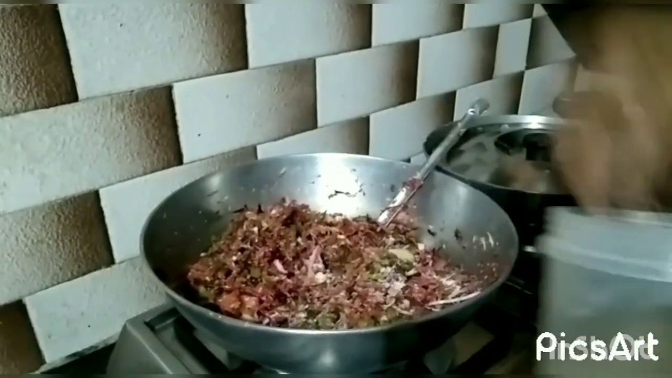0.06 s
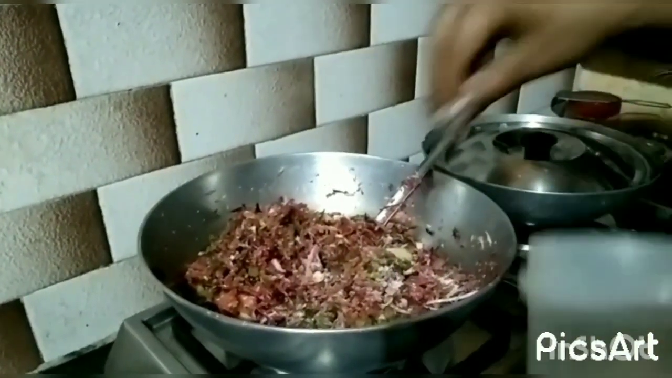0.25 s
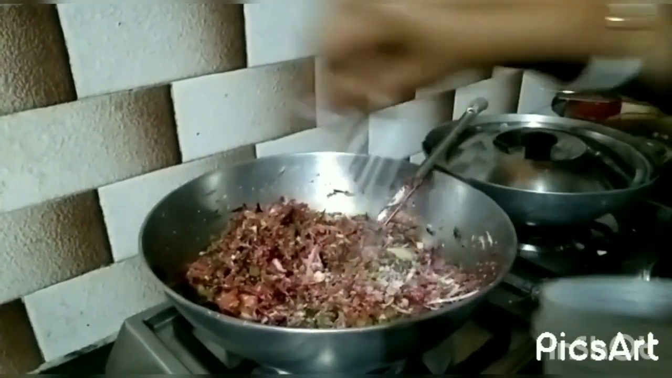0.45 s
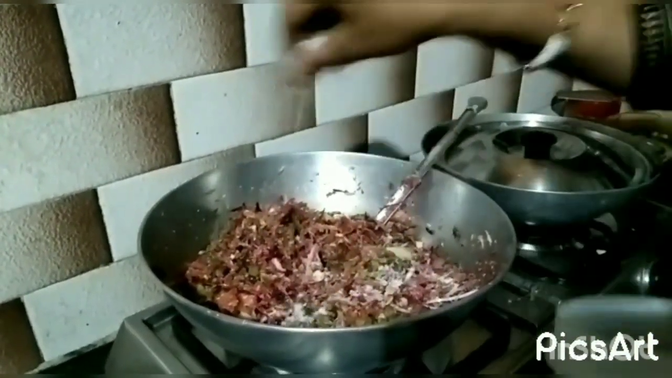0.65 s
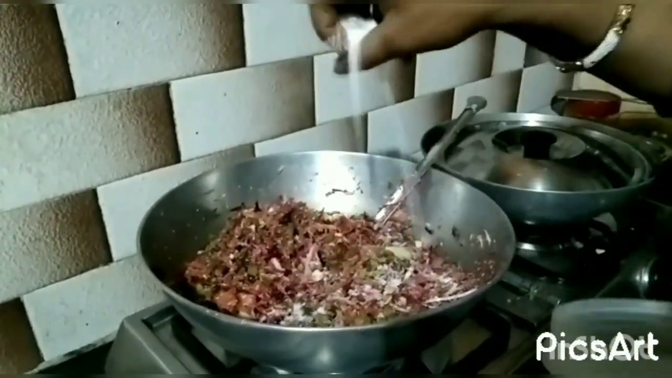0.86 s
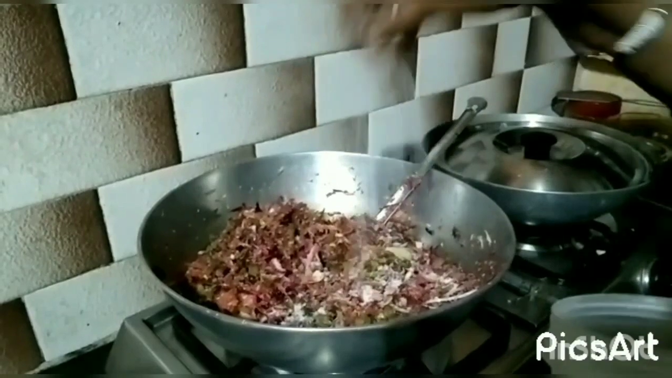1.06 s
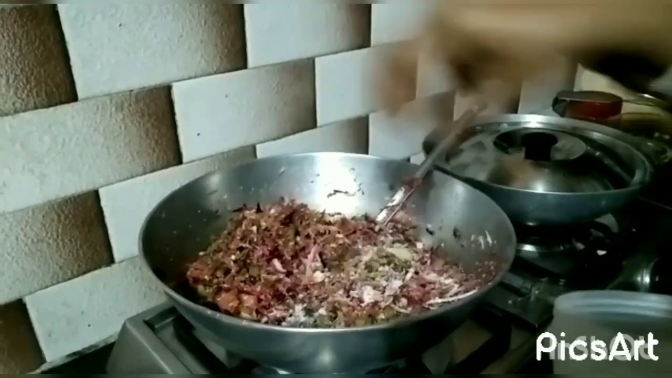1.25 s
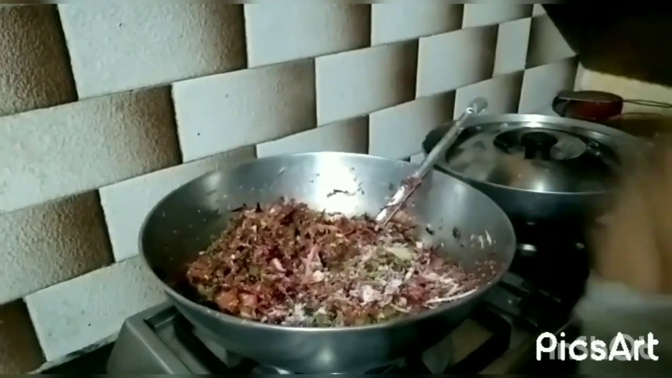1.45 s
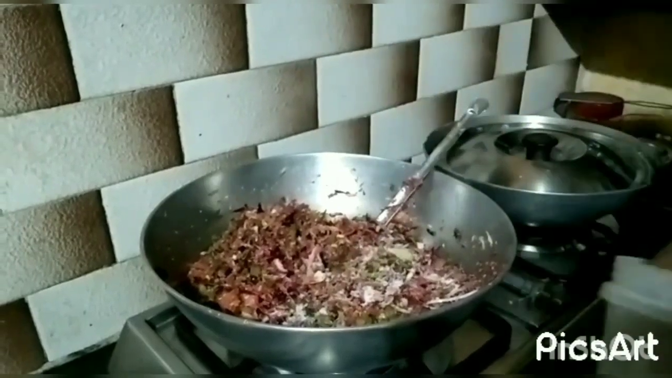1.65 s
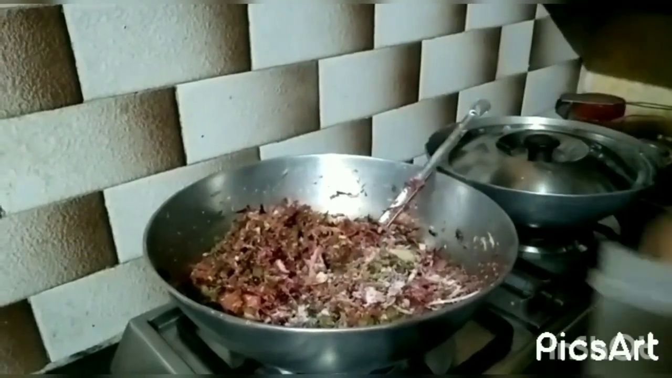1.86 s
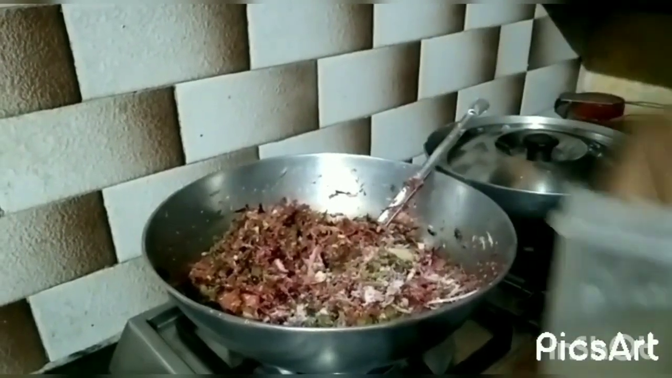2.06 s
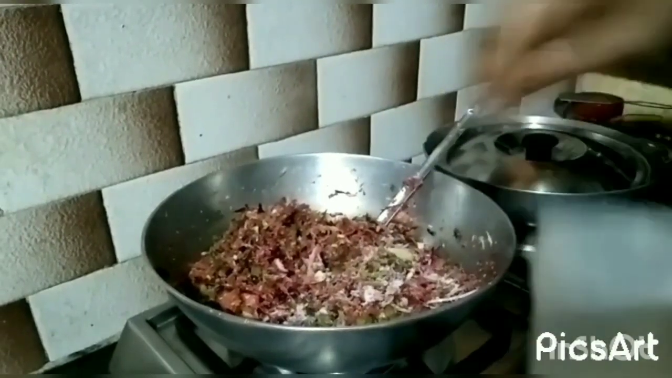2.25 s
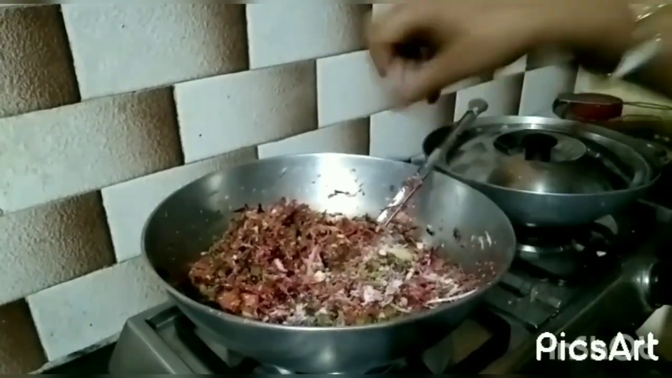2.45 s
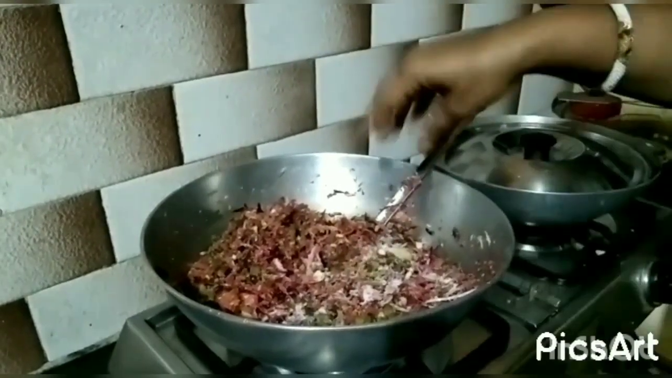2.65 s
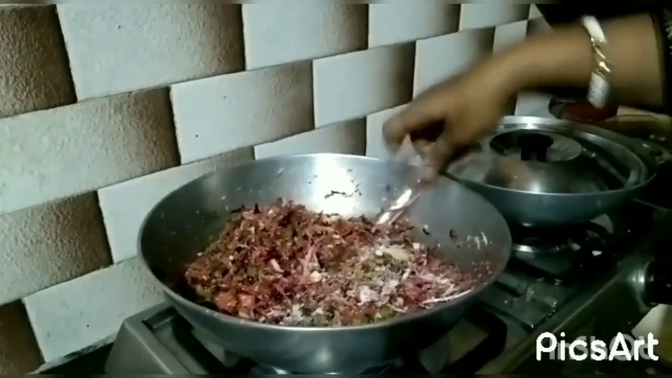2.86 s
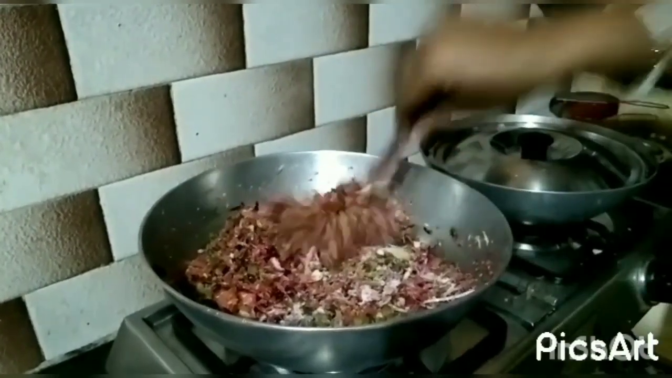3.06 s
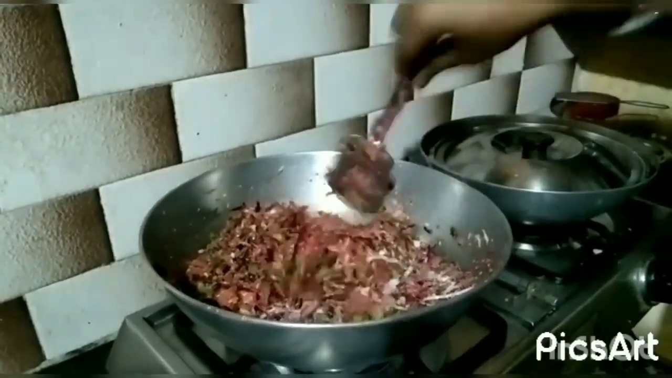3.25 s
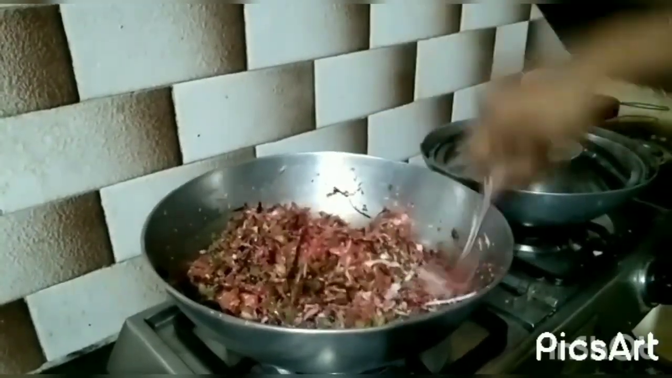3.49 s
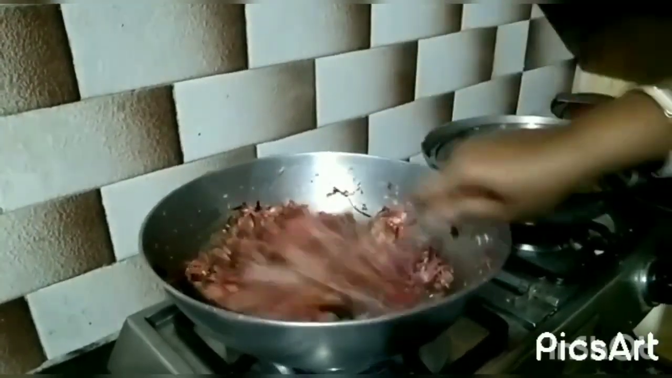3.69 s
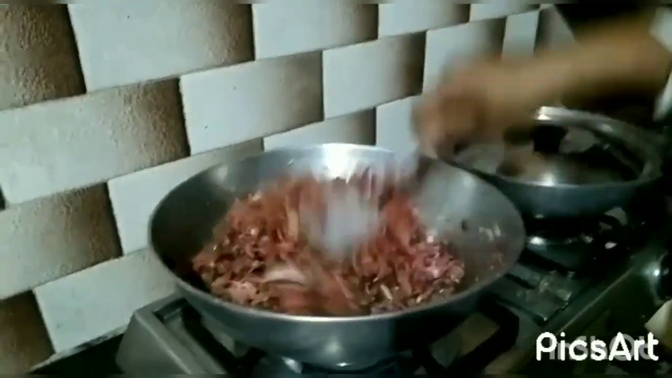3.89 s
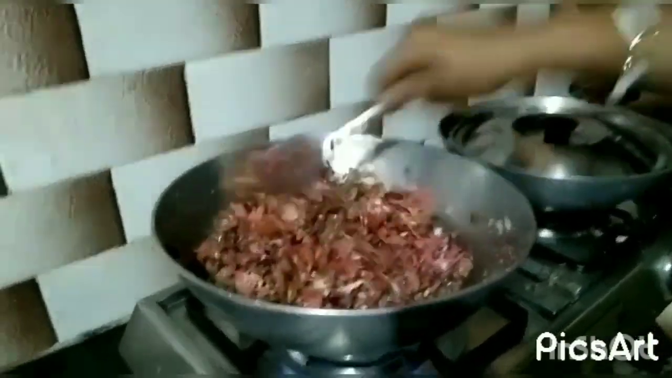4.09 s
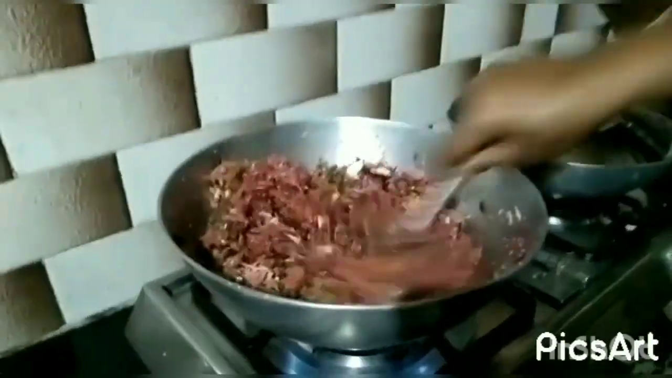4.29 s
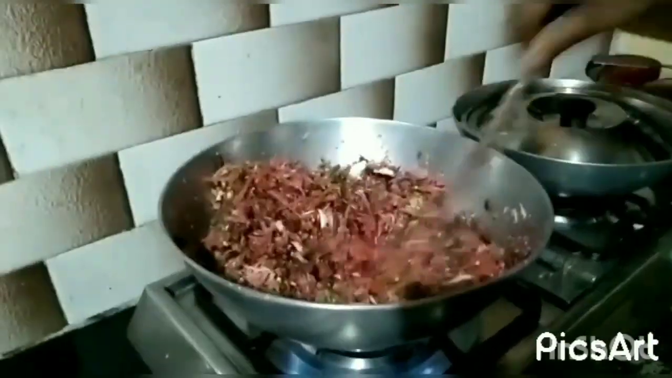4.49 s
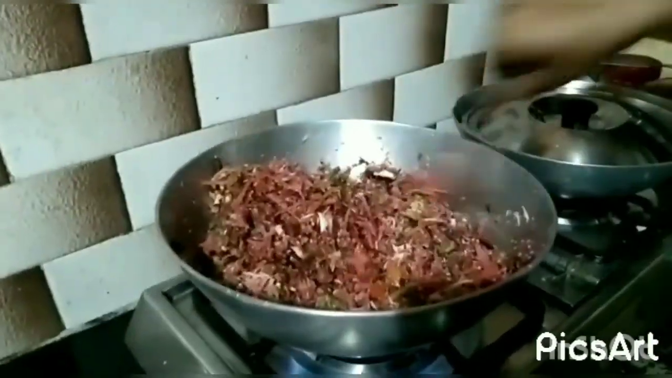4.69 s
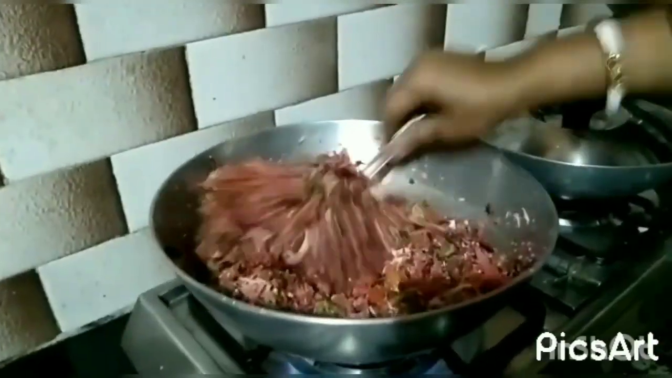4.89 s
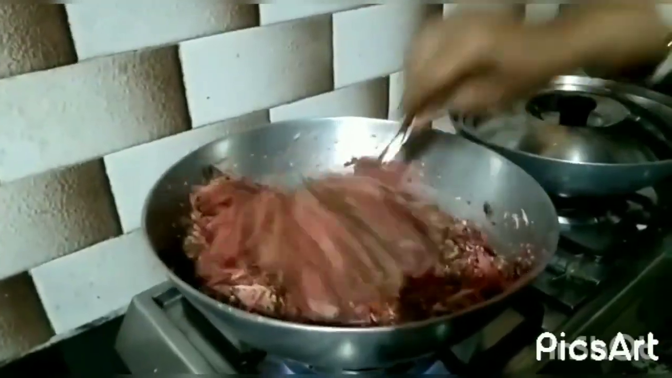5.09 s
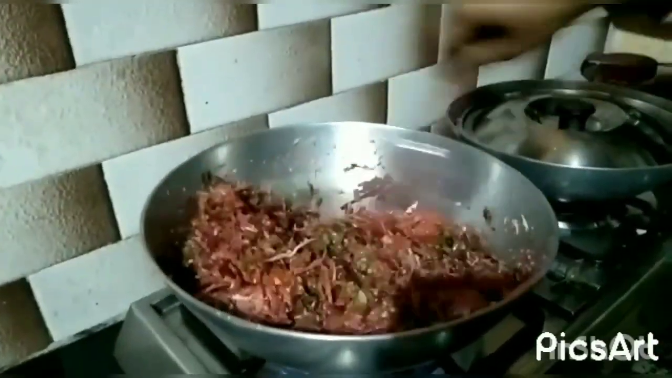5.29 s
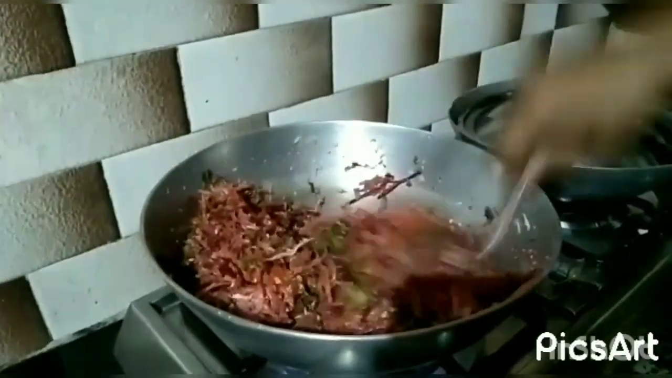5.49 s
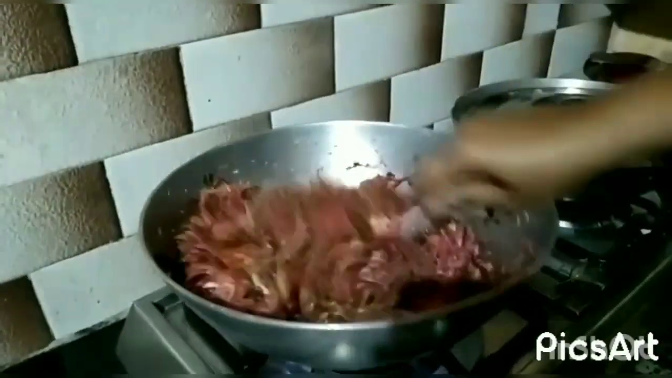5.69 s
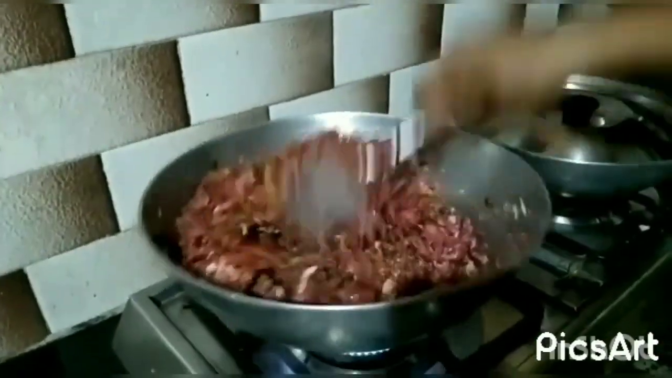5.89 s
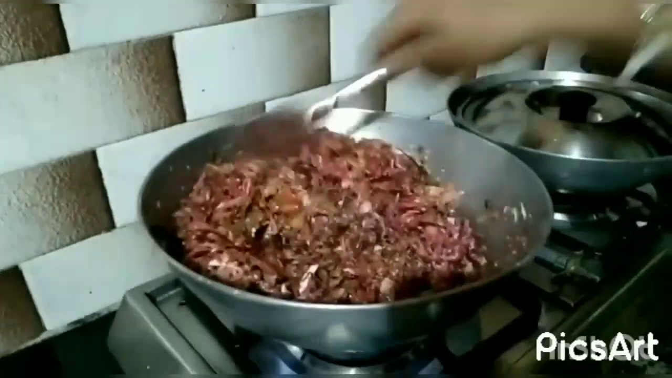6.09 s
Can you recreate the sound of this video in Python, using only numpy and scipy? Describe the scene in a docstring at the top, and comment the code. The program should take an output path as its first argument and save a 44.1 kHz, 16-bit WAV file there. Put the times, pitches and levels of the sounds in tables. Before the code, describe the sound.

Close, mono, in a small tiled kitchen with a short reverberation. From 0 to 3 seconds there is only a steady, bright, finely sputtering frying hiss, over a very faint lumpy gas flame roar and a low wavering mains hum. At 3.0 a jar lands on the counter with a sharp, short thud; at 3.3 a softer, duller nudge follows. From 3.55 to 3.9 a steel spatula scrapes lightly down the pan wall with small high ticks, then brief weaker scrapes come at 4.05 and 4.6, with faint bowl knocks between. The sizzle rises a little around 4.2. At 4.85 to 5.2 a stronger, ringing scrape chatters with several ticks. At 5.53 the loudest scrape bites in with a piercing metallic tick and slides until 5.9. At 6.0 a hard double knock clangs on the steel bowl, the sizzle now louder.

```python
"""Chopped vegetables sizzle in a thin steel pan over a gas flame, with mains hum beneath, heard close in mono.
A jar is set down on the counter; then a steel spatula lands on the pan wall, scrapes down it in strokes,
turns the food onto hot metal so that it sizzles louder, and knocks the bowl of the pan.
Metal and counter are banks of resonances driven by clicks and blows; sizzle and flame are shaped noise,
the hum is a pair of sines, and the kitchen is a tail of random taps."""
import sys
import numpy as np
from scipy import signal
from scipy.io import wavfile
from scipy.ndimage import uniform_filter1d

SR = 44100
rng = np.random.default_rng(int(sys.argv[2]) if len(sys.argv) > 2 else 0)


def ratio(d):
    """dB to gain"""
    e = np.asarray(d, float) / 20
    return 10 ** e


def generate_wav(signal):
    """Clip the signal to [-1, 1] and save it as 16-bit WAV at the path in sys.argv[1]."""
    frames = np.transpose(np.atleast_2d(signal))
    scaled = np.clip(frames, -1, 1) * 32767
    pcm = np.round(scaled).astype(np.int16)
    wavfile.write(sys.argv[1], SR, pcm)


N = 270774

# resonances of the spatula blade under a sliding edge: (frequency [Hz], width [Hz], relative level [dB])
BLADE = [(4300, 100, -4), (4550, 90, -4), (4770, 45, 1), (4950, 90, -5), (5120, 80, -4), (5357, 55, 0),
         (5477, 50, 1), (5700, 90, -4), (5930, 70, -3), (6293, 50, 0), (6600, 90, -2)]
# resonances of the pan wall: (frequency [Hz], width [Hz], relative level [dB])
WALL = [(1536, 40, 0.5), (1688, 40, 2.5), (1836, 50, 3), (2580, 58, -2), (3375, 240, 11), (3685, 72, 2.5)]
# resonances of the blade's thin tip, loud at first contact: (frequency [Hz], width [Hz], relative level [dB])
TIP = [(6750, 49, 9), (7440, 200, 15), (7750, 120, 7), (7970, 49, 1), (7900, 119.9, -9),
       (10060, 75.9, -9.5), (10035, 200, 0), (11129, 261.7, -12), (12900, 420, -9)]
# spectrum of the edge on rough steel: (frequency [Hz], relative density [dB per Hz])
GRIT = [(600, -49), (1500, -31), (3000, -7.5), (5500, 3), (7000, -0.5), (9000, -17), (15000, -51.5)]


def evened(x):
    """Scales to rms 1."""
    return x / np.sqrt(np.mean(x ** 2) + 1e-20)


def read(points, hz):
    """Reads a spectrum on a log-frequency axis."""
    f, value = np.transpose(points)
    return np.interp(np.log(hz + 1), np.log(f + 1), value)


def add(mix, s, sound):
    """Mixes a sound in at time s, cut at the end of the mix."""
    part = mix[round(s * SR):][:len(sound)]
    part += sound[:len(part)]


def coloured(x, points):
    """Gives x a spectrum through a causal minimum-phase filter, at rms 1."""
    gain_db = np.maximum(read(points, abs(np.fft.fftfreq(8192, 1 / SR))), -100)
    log_gain = np.log(ratio(gain_db))
    phase = -signal.hilbert(log_gain).imag
    taps = np.fft.ifft(np.exp(log_gain + 1j * phase)).real[:4096]
    return evened(signal.oaconvolve(x, taps)[:len(x)])


def wander(size, hz):
    """Slow chance of rms 1: noise through a gentle low-pass at hz."""
    return evened(signal.lfilter(*signal.butter(1, hz, fs=SR), rng.standard_normal(size)))


def pops(size, per_s, spread_db):
    """A random train of clicks at rms 1, a few of them large."""
    sizes = ratio(spread_db * np.minimum(rng.exponential(1, size), 5))
    signs = rng.choice([-1., 1.], size)
    return evened(sizes * signs * (rng.random(size) < per_s / SR))


def mode(x, hz, width):
    """One two-pole resonance, deaf to steady pressure."""
    r = np.exp(-np.pi * width / SR)
    return signal.lfilter([.5, 0, -.5], [1, -2 * r * np.cos(2 * np.pi * hz / SR), r * r], x)


def rung(x, modes):
    """Passes x through a set of resonances, at rms 1."""
    return evened(sum(ratio(db) * np.sqrt(width) * mode(x, hz, width) for hz, width, db in modes))


def near(hz, centre_hz, octaves):
    """Share of a mode: strongest by the centre, with a floor for the others."""
    return 0.047 + np.exp(-.5 * (np.log2(hz / centre_hz) / octaves) ** 2)


def stroke(rows):
    """Dense stick-slip clicks of the sliding edge ring blade and pan wall and add wide grit."""
    medium_db, sing = -30.5, 0.19  # the harder the press, the more the blade outsings the rest [dB per dB]
    flutter_db, flutter_hz = 3, 25  # each blade mode comes and goes as the touching spot shifts
    s, *columns = np.transpose(rows)
    t = np.arange(s[0], s[-1], 1 / SR)
    pressure_db, centre_hz = (np.interp(t, s, c) for c in columns)

    def sliding(at_rim, at_bottom):
        return np.interp(t, s[[0, -1]], (at_rim, at_bottom))

    # levels against the blade, as the edge slides from rim to bottom
    yielding_db = sing * (pressure_db - medium_db)
    grit_db = sliding(-9.5, -3.5) - yielding_db
    wall_db = sliding(-14, -0.5) - yielding_db
    tip_db = sliding(-6.5, -37) - yielding_db

    touching = np.clip(np.minimum((t - s[0]) / .002, (s[-1] - t) / .01), 0, 1)
    slips = pops(len(t), 7000, spread_db=2.2) * ratio(2.2 * wander(len(t), 60)) * touching

    blade = np.zeros(len(t))
    for hz, width, db in BLADE:
        flutter = ratio(flutter_db * wander(len(t), flutter_hz))
        drive = slips * near(hz, centre_hz, .095) * flutter
        blade += ratio(db) * np.sqrt(width) * mode(drive, hz, width)
    # a narrow blade radiates little below its modes
    blade = signal.lfilter(*signal.butter(3, 3800, "high", fs=SR), blade)

    spot_hz = sliding(1900, 1380)  # the low wall mode that the edge favours sinks as it slides down
    wall = np.zeros(len(t))
    for hz, width, db in WALL:
        share = near(hz, spot_hz, .06) if hz < 2000 else 1
        wall += ratio(db) * np.sqrt(width) * mode(slips * share, hz, width)

    sound = evened(blade) + ratio(wall_db) * evened(wall)
    sound += ratio(tip_db) * rung(slips, TIP) + ratio(grit_db) * coloured(slips, GRIT)
    return ratio(pressure_db) * sound


def scraping():
    """The spatula edge slides down the pan wall, stroke after stroke, under changing pressure."""
    # one curve a stroke: (time [s], pressure [dB], frequency where the bent blade sings most [Hz])
    stroke_curves = [
        [(3.55, -44, 5350), (3.57, -32.5, 5350), (3.65, -29.5, 5500), (3.74, -35.5, 5030), (3.84, -40, 5250),
         (3.9, -63, 4950)],
        [(4.037, -33, 4900), (4.075, -32, 4570), (4.09, -42, 4800), (4.16, -49, 5000)],
        [(4.56, -46, 5100), (4.6, -39, 4950), (4.64, -45, 4980)],
        [(4.856, -19.5, 5430), (4.92, -33.5, 5300), (4.96, -24, 5160), (5.0, -25.5, 4900), (5.05, -32.5, 4750),
         (5.09, -30, 4800), (5.17, -42, 5200)],
        [(5.527, -11, 5420), (5.537, -19.5, 5430), (5.585, -25.5, 5700), (5.65, -27, 5200), (5.68, -27, 4800),
         (5.74, -29, 4900), (5.78, -30.5, 5160), (5.81, -31, 5300), (5.85, -33, 4850), (5.9, -49, 5000)],
    ]
    strokes = np.zeros(N)
    for rows in stroke_curves:
        add(strokes, rows[0][0], stroke(rows))
    return strokes


def catch(peak_db, centre_hz):
    """A few milliseconds of chatter of the edge set the blade ringing."""
    grit_db = -12 - .2 * peak_db  # against the ringing; softer catches are grittier
    t = np.arange(SR // 12) / SR
    chatter = rng.standard_normal(len(t)) * t * np.exp(-t / 0.0014)
    ring = np.zeros(len(t))
    for hz, width, db in BLADE + WALL[-2:]:
        ring += ratio(db) * near(hz, centre_hz, 0.061) * mode(chatter, hz, 100 + width)
    sound = evened(ring) + 0.033 * rung(chatter, TIP) + ratio(grit_db) * coloured(chatter, GRIT)
    # a small edge moves little air
    sound = signal.lfilter(*signal.butter(3, 3000, "high", fs=SR), sound)
    return ratio(peak_db) * sound / abs(sound).max()


def catching():
    """The spatula edge lands on the steel or catches on it, each time with a short metallic tick."""
    # landings and catches: (time [s], peak level [dB], frequency where the blade sings most [Hz])
    catch_events = [(3.568, -24, 5400), (3.618, -13, 5430), (3.6317, -17, 5600), (3.6575, -13.5, 5470),
                    (3.702, -21, 5951), (3.8501, -19, 4200), (4.0386, -16.5, 5150), (4.5771, -21, 3868),
                    (4.6034, -20, 5781), (4.8568, -13, 5400), (4.8902, -20, 5448), (4.9575, -11, 5600),
                    (4.9866, -14, 5640), (5.048, -18.5, 5570), (5.058, -13.5, 4757), (5.0814, -15, 4360),
                    (5.1147, -18.5, 6291), (5.19, -18, 3790), (5.5292, -1.5, 5300), (5.542, -10, 5460),
                    (5.5636, -17, 5456), (5.62, -10, 5488), (5.6663, -13.5, 5374), (5.7054, -14, 5320),
                    (5.81, -10.5, 5410), (5.8302, -11.5, 4744), (5.8464, -12, 4870)]
    ticks = np.zeros(N)
    for s, peak_db, centre_hz in catch_events:
        add(ticks, s, catch(peak_db, centre_hz))
    return ticks


def blow(modes, dense, peak_db, contact_ms, rattle_ms, spot_hz, dense_db, low_t60, high_t60):
    """A push and its dying rattle ring the modes; a longer contact is duller."""
    t = np.arange(SR // 2) / SR
    push = np.exp(-t[:400] / (contact_ms / 1000))
    rattle = 0.2 * pops(len(t), 650, spread_db=6.0) * np.sqrt(600 / SR) * np.exp(-t / (rattle_ms / 1000))
    rattle[0] += 1  # the first hit
    ring = np.zeros(len(t))
    for hz, db, t60 in modes:
        chance = rng.choice([-1., 1.]) * rng.uniform(.6, 1.2)  # no two blows alike
        gain = chance * ratio(db) * (0.4005 + near(hz, spot_hz, 0.35))
        ring += gain * mode(rattle, hz, np.log(1000) / np.pi / t60)

    blur = coloured(rng.standard_normal(len(t)), dense)  # modes too close to tell apart
    low = signal.lfilter(*signal.butter(2, 1500, fs=SR), blur)
    blur = low * ratio(-60 * t / low_t60) + (blur - low) * ratio(-60 * t / high_t60)  # the treble dies first
    sound = signal.oaconvolve(evened(ring) + ratio(dense_db) * evened(blur), push)[:len(t)]
    return ratio(peak_db) * sound / abs(sound).max()


def bowl_blow(peak_db, spot_hz):
    """The struck steel bowl rings briefly; the contact lengthens as the blow weakens."""
    # modes of the bowl, damped by food: (frequency [Hz], relative level [dB], t60 [s])
    bowl_modes = [(247, -10, .15), (274, -2, .15), (305, 2, .22), (440, -10, .22), (464, -6, .28),
                  (540, -10, .15), (662, -2, .15), (715, -1, .17), (773, 2, .17), (918, -11, .15),
                  (1068, -3, .17), (1288, -8, .14), (1454, -7, .16), (1538, -4, .16), (1594, -6, .16),
                  (1802, -3, .16), (2050, -11, .15), (2490, -9, .12), (2990, -8, .1), (3290, -6, .1),
                  (3762, -6, .1), (4350, -9, .08), (5000, -11, .07), (6000, -13, .05)]
    # spectrum of the bowl's many close modes: (frequency [Hz], relative density [dB per Hz])
    clatter = [(120, -28.5), (280, -7), (720, -6.5), (1200, -6), (2000, -5), (3500, -1.5), (6000, -7),
               (9000, -28), (14000, -39)]
    contact_ms = 0.014 * ratio(-.5 * peak_db)
    return blow(bowl_modes, clatter, peak_db, contact_ms, rattle_ms=17, spot_hz=spot_hz,
                dense_db=0, low_t60=0.39, high_t60=0.1867)


def counter_blow(peak_db, contact_ms, rattle_ms, spot_hz):
    """The struck counter top thuds, its treble dying much faster than its bass."""
    # modes of the counter top: (frequency [Hz], relative level [dB], t60 [s])
    counter_modes = [(119, -26, 0.1194), (157.6, 4.5, 0.16), (204, -2.5, 0.098), (251.3, -5, 0.35),
                     (274.2, 3.5, 0.19), (347, -2, 0.082), (420.27, 3, 0.075), (480, 0, 0.1),
                     (546, 2.5, 0.045), (582, 9, 0.067), (702, 11.5, 0.04), (770, 6.5, 0.099),
                     (892, 6, 0.055), (1224, 8.5, 0.058), (2614, 16.5, 0.018), (4595, 2, .015)]
    # spectrum of the counter's close modes: (frequency [Hz], relative density [dB per Hz])
    thump = [(35, -43), (75, -7), (130, 2), (260, -1.5), (420, -1.5), (730, -3.5), (1300, -10), (1900, -22),
             (2500, 0.5), (4700, -10), (8000, -30)]
    return blow(counter_modes, thump, peak_db, contact_ms, rattle_ms, spot_hz,
                dense_db=-1.5, low_t60=0.13, high_t60=0.0198)


def knocking():
    """The spatula knocks the bowl; each knock rocks the pan on its stand and thuds into the counter."""
    # knocks: (time [s], peak level [dB], frequency of the modes that the spot favours [Hz])
    knock_events = [(3.853, -32.5, 520), (4.037, -30.5, 810), (4.101, -35, 800), (4.443, -37, 900),
                    (4.573, -33, 480), (4.855, -36, 650), (5.187, -31, 517), (5.242, -38, 700),
                    (5.528, -33.5, 520), (5.81, -32.5, 465), (5.996, -6, 700), (6.008, -11, 806)]
    rock_lag_s = 0.00317
    knocks = np.zeros(N)
    for s, peak_db, spot_hz in knock_events:
        add(knocks, s, bowl_blow(peak_db, spot_hz))
        rock_db = -36 + 0.17 * peak_db
        add(knocks, s + rock_lag_s, counter_blow(rock_db, contact_ms=0.32, rattle_ms=9, spot_hz=180))
    return knocks


def jar():
    """A jar set down and nudged rings the counter top."""
    # thuds: (time [s], peak level [dB], contact time [ms], frequency of the modes that the spot favours [Hz])
    thud_events = [(3.005, -10.5, 0.032, 550), (3.008, -21, 0.2, 250), (3.272, -26, 0.78, 190),
                   (3.291, -34.5, 0.3, 450)]
    thuds = np.zeros(N)
    for s, peak_db, contact_ms, spot_hz in thud_events:
        add(thuds, s, counter_blow(peak_db, contact_ms, rattle_ms=4.1, spot_hz=spot_hz))
    return thuds


def sizzle():
    """Dense bubble bursts over steam hiss, sputtering in short swells."""
    # how hard the food fries: (time [s], level [dB])
    frying = [(0.0, -33), (0.17, -34), (1.96, -33.5), (2.21, -34), (3.6, -33), (4.2, -31), (4.9, -31.5),
              (5.45, -32), (5.7, -32), (6.14, -29.5)]
    # spectrum of bursting steam bubbles: (frequency [Hz], relative density [dB per Hz])
    bubbles = [(530, -23), (900, -14.5), (1000, -9.5), (1090, -14), (1170, -10), (1330, -14.5),
               (1690, -7.5), (2640, -3), (2870, -3.5), (3190, 0.5), (5250, 1.5), (6420, -2.5), (8330, -15),
               (10900, -19), (13500, -36), (15500, -36)]
    s, db = np.transpose(frying)
    fry = evened(1.5 * rng.standard_normal(N) + .5 * pops(N, 2500, spread_db=0.5))
    sputter_db = 0.38 * wander(N, 2.5) + 0.52 * wander(N, 65.0)
    return coloured(fry * ratio(sputter_db), bubbles) * ratio(np.interp(np.arange(N) / SR, s, db))


def flame():
    """The gas flame's low, lumpy roar: shaped noise of wandering strength."""
    # spectrum of the roar: (frequency [Hz], relative density [dB per Hz])
    roar_spectrum = [(15, -49), (25, -47), (48, -21), (72, -0.5), (97, -10.5), (143, -2.5), (295, -7.5),
                     (344, -14), (452, -4), (519, -8), (671, -2), (1100, -17), (1500, -4), (1950, -51),
                     (3300, -120)]
    lumpy = rng.standard_normal(N) * ratio(1.3 * wander(N, 7.1))
    return coloured(lumpy, roar_spectrum) * ratio(-50.5)


def hum():
    """Mains hum: sines of fixed pitch whose levels waver quickly and clearly."""
    # partials: (frequency [Hz], rms level about which it wavers [dB])
    partials = [(99.8, -55), (50.7, -72)]
    t = np.arange(N) / SR
    tones = np.zeros(N)
    for hz, db in partials:
        tones += np.sqrt(2) * ratio(db + 3 * wander(N, 12)) * np.sin(2 * np.pi * hz * t)
    return tones


def kitchen(x):
    """Sparse taps of random sign off tiled walls, each band dying at its own speed."""
    # reverberation time of the room: (frequency [Hz], t60 [s])
    room_t60 = [(200, 0.36), (1000, 0.27), (4000, 0.26), (12000, 0.19)]
    taps = np.zeros(SR // 2)
    at = np.arange(120, SR // 2 - 20, 20)
    taps[at + rng.integers(0, 20, len(at))] = rng.choice([-1., 1.], len(at))
    hz, t, z = signal.stft(taps, SR, nperseg=256)
    dying = ratio(-60 * t / read(room_t60, hz)[:, None])
    tail = signal.istft(z * dying, SR, nperseg=256)[1]
    return signal.fftconvolve(x, tail / np.linalg.norm(tail))[:N]


def scene():
    """Stirring, knocks and jar with their room, over the frying, the flame and the hum."""
    work = scraping() + catching() + knocking() + jar()
    # a gentle low-pass softens the highest treble of the scrapes, knocks and jar
    work = signal.lfilter(*signal.butter(3, 11000, fs=SR), work)
    mono = work + ratio(-7) * kitchen(work) + sizzle() + flame() + hum()
    return np.array([mono, mono])


def roll_off(x):
    """The treble ends steeply here."""
    return signal.sosfilt(signal.butter(12, 15390, fs=SR, output="sos"), x)


def record(dry):
    """Gain control looks a little ahead, ducks loud moments and recovers."""
    threshold_db, ducking = -15.0, 0.18  # ducking in dB per dB over the threshold
    power_db = 10 * np.log10(abs(uniform_filter1d(dry[0] ** 2, 300)) + 1e-12)
    fall = np.arange(N) * 60. / SR  # the held level falls 60 dB a second
    held_db = np.maximum.accumulate(power_db + fall) - fall
    over_db = np.maximum(held_db - threshold_db, 0)
    return roll_off(dry / ratio(ducking * uniform_filter1d(over_db, 200)))


dry = scene()
out = record(dry)
generate_wav(out)
```